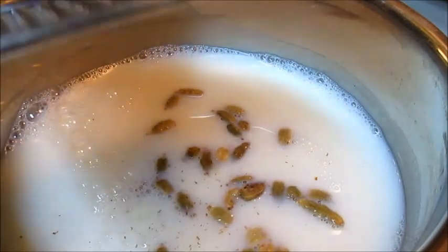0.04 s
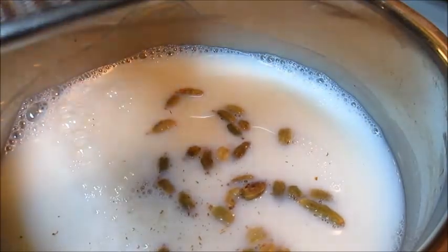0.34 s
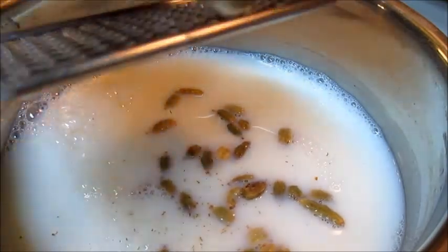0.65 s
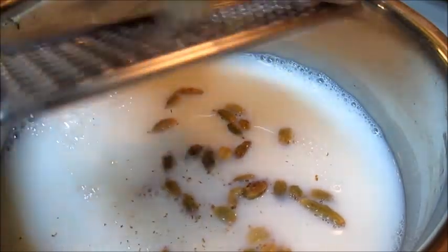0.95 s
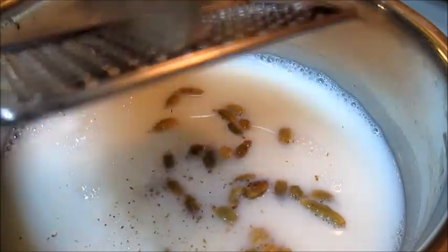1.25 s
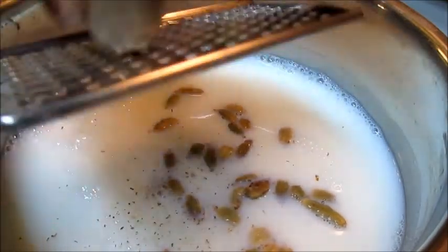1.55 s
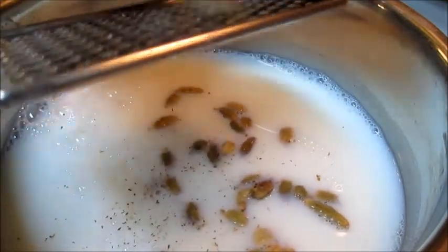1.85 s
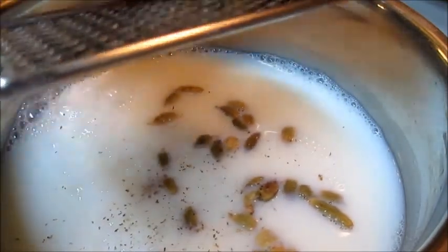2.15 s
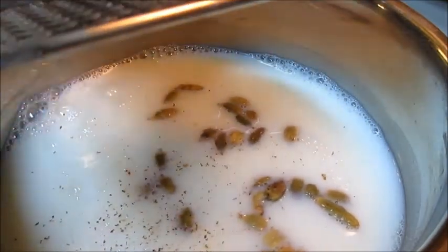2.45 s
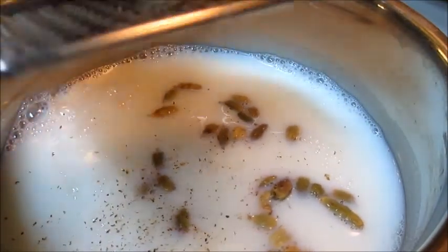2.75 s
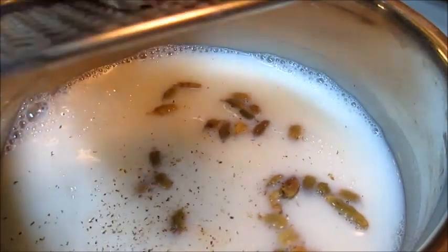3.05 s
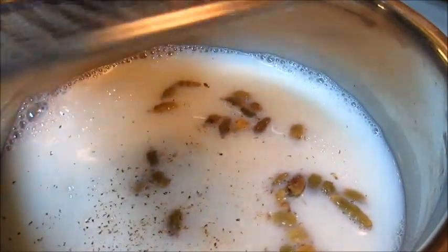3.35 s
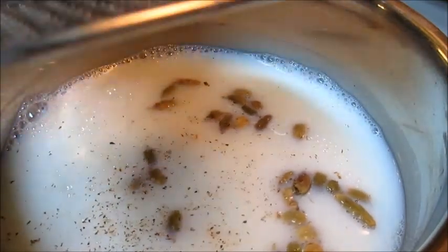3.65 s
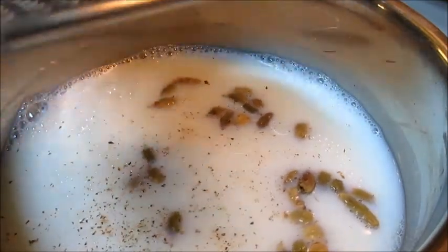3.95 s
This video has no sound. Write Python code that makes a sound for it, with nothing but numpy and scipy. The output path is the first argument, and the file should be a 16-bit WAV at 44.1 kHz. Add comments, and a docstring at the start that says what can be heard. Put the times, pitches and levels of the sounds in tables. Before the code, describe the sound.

A hard spice is grated on a metal grater, close to the microphone. A light metal tap comes at the very start. From about 0.5 seconds until the end at 4 seconds, short, bright rasps go back and forth, nearly four cycles a second. The return strokes bump over the teeth and make the plate ring briefly. Small knocks and sharp ticks are scattered throughout, over a soft, low kitchen hum.

```python
"""First comes a light metal tap as the grater touches the pot; then quick grating starts, to and fro.
A hard spice is rubbed on a flat metal grater held over a pot of milk. The teeth chip it in
bright, rasping cuts. On each way back it bumps over them and the plate rings near 1 kHz,
at a pitch that follows the point of contact. Knocks on the plate and sharp ticks come
now and then, and a soft kitchen hum lies underneath."""
import sys
import numpy as np
from scipy import signal
from scipy.fft import rfft, irfft
from scipy.io import wavfile
from scipy.ndimage import uniform_filter1d

SR = 44100
rng = np.random.default_rng(int(sys.argv[2]) if len(sys.argv) > 2 else 0)


def bounce(signal):
    """Save signal as a 16-bit WAV file at the path given by the first command-line argument."""
    frames = np.transpose(np.atleast_2d(signal))
    limited = np.clip(frames, -1, 1)
    pcm = np.round(limited * 32767).astype(np.int16)
    wavfile.write(sys.argv[1], SR, pcm)


N = 176400  # 4 seconds
TEETH_PER_S = 110  # how many teeth the moving spice meets each second


def amp(db):
    """Turns decibels into a number to multiply by."""
    return 10 ** (np.asarray(db) / 20)


def unit(x):
    """Scales a sound to a total energy of 1."""
    return x / np.sqrt(np.sum(x ** 2) + 1e-20)


def read(points, hz):
    """Looks up a table between its rows, with every octave equally wide."""
    f, value = np.transpose(points)
    return np.interp(np.log(hz + 1), np.log(f + 1), value)


def add(mix, start_s, sound):
    """Adds a sound to the mix at a given time."""
    part = mix[max(round(start_s * SR), 0):][:len(sound)]
    part += sound[:len(part)]


def click(tone, size=4096):
    """A click with the given balance of low and high frequencies."""
    log_gain = np.log(amp(read(tone, abs(np.fft.fftfreq(size, 1 / SR)))))
    spectrum = np.exp(np.conj(signal.hilbert(log_gain)))  # packs the energy at the start
    return unit(np.fft.ifft(spectrum).real[:size // 2])


def ringing(notes):
    """The fading sine waves of a struck object."""
    t = np.arange(SR // 2) / SR
    return unit(sum(amp(db - 60 * t / fade_s) * np.sin(2 * np.pi * hz * t) for hz, db, fade_s in notes))


def echoes(fade_times, size=22050):
    """Dense echoes: noise that fades by 60 dB in the time given for each frequency."""
    hz, t, bands = signal.stft(rng.standard_normal(size), SR, nperseg=128)
    fade = amp(-60 * t / read(fade_times, hz)[:, None])
    return unit(signal.istft(bands * fade, SR, nperseg=128)[1][:size])


def through(force, body):
    """Plays a force through a body, given as its sound when tapped once."""
    return unit(signal.oaconvolve(force, body[:len(force)])[:len(force)])


# Tone of the kitchen hum (frequency [Hz], level [dB per Hz])
HUM_TONE = [(25, -1.5), (70, -9), (120, -2.5), (180, -6.5), (380, -3), (800, -6), (1500, -13.5),
            (3000, -26.5), (7000, -34), (15000, -45)]
# How loud the hum is as time passes (time [s], level [dB])
HUM_LOUDNESS = [(0, -53.5), (.1, -63), (.25, -56.5), (.48, -51.5), (.8, -52), (1.5, -58), (4, -55.5)]


def kitchen_hum(hiss_db=-75.5):
    """Soft, low noise that swells before the grating starts, over a faint steady hiss."""
    tone = amp(read(HUM_TONE, np.fft.rfftfreq(N, 1 / SR)))
    noise = irfft(rfft(rng.standard_normal(N)) * tone, N)
    level = amp(np.interp(np.arange(N) / SR, *np.transpose(HUM_LOUDNESS)))
    return unit(noise) * np.sqrt(N) * level + amp(hiss_db) * rng.standard_normal(N)


# Tone of the thud (frequency [Hz], level [dB per Hz])
THUD_TONE = [(25, -23), (60, -3), (110, 4), (180, 6.5), (350, 0), (600, -19.5), (1500, -108), (6000, -135)]


def thud(force):
    """The dull push of the hand and the spice."""
    return through(force, click(THUD_TONE))


# The bending plate's own notes (pitch [Hz], level [dB], time to fade by 60 dB [s])
PLATE_NOTES = [(1040, 0, .19), (1143, -7, .07), (2020, -7, .09)]


def plate(force, hz, width_hz):
    """The plate bends at a pitch set by the point of contact, then rings on with its own notes."""
    bend = resonate(force, hz, width_hz)
    overtone = unit(resonate(force, 1.735 * hz, 2 * width_hz))
    own_notes = through(unit(bend) + unit(force), ringing(PLATE_NOTES))
    return unit(through(bend, click(RASP_TONE)) + amp(-10) * overtone + amp(-8.5) * own_notes)


def resonate(force, hz, width_hz):
    """Keeps a narrow band of sound around a pitch that may slide."""
    turn = np.exp(2j * np.pi * np.cumsum(hz) / SR)
    r = np.exp(-np.pi * width_hz / SR)
    # Shift the pitch down to 0 Hz, smooth, then shift it back up.
    return (turn * signal.lfilter([(1 - r) ** 2], [1, -2 * r, r ** 2], force / turn)).real


# How long plate and pot ring on (frequency [Hz], time to fade by 60 dB [s])
RING_TIMES = [(200, 0.036), (700, 0.057), (2000, 0.056), (5000, 0.048), (14000, 0.033)]


def ring_out(force, gain_db=5.5):
    """Plate and pot ring on briefly after each touch."""
    return amp(gain_db) * signal.fftconvolve(force, echoes(RING_TIMES, size=4096))[:len(force)]


# Tone of spice scraping on steel (frequency [Hz], level [dB per Hz])
RASP_TONE = [(300, -23.5), (530, -11), (715, 2.5), (900, 1), (1270, -3.5), (1600, 1), (2020, 2), (2650, -6),
             (3200, -2), (4400, -4), (6000, -7.5), (10500, -15.5), (13000, -21), (15500, -32)]
# The steel's higher, thinner notes (pitch [Hz], level [dB], time to fade by 60 dB [s])
STEEL_NOTES = [(1545, -4, .06), (1735, -2, .06), (2023, 0, .08), (2005, -23, .9), (2485, -6, .07),
               (3865, -5, .045), (4168, -3, .05), (4700, -5, .05), (5660, -8, .06), (6360, -10, .06)]


def rasp(force, rows=3, steel_db=-9.5):
    """A scrape on steel; each row of teeth rings out a little differently."""
    row = (np.arange(len(force)) * TEETH_PER_S / SR).astype(int) % rows
    ring = sum(ring_out(force * (row == k)) for k in range(rows))
    scrape = through(force + ring, click(RASP_TONE))
    return scrape + amp(steel_db) * through(force, ringing(STEEL_NOTES))


def grit(size, cracks_per_s=14000, spread_db=5):
    """Tiny cracks in the spice, some much stronger than others."""
    cracks = (rng.random(size) < cracks_per_s / SR) * rng.choice([-1, 1], size)
    return cracks * amp(spread_db * np.minimum(rng.exponential(1, size), 2.5))


def scuff(from_s=0.56, press_s=0.0024, light_touch_db=-26):
    """The spice slides lightly between strokes and presses harder just before each one."""
    t = np.arange(N) / SR
    starts = np.sort([row[0] for row in list(CUT_STROKES) + list(BACK_STROKES)])
    until_next = np.append(starts, np.inf)[np.searchsorted(starts, t)] - t
    pressure = amp(light_touch_db) + np.exp(-until_next / press_s)
    force = grit(N) * (t > from_s) * pressure
    return np.sqrt(N) * (amp(-58) * rasp(force) + amp(-60.5) * through(force, ringing(PLATE_NOTES)))


def tick(force, above_hz=3600):
    """A sharp tick: only the treble of a short hit on the steel."""
    treble = signal.butter(2, above_hz, "high", fs=SR, output="sos")
    return through(signal.sosfilt(treble, force + ring_out(force)), click(RASP_TONE))


# The opening metal tap, then knocks on the plate
# (time [s], rasp level [dB], plate level [dB], plate pitch [Hz])
TAP_AND_KNOCKS = [(0.014, -32.5, -38, 933), (0.522, -29.5, -43, 870), (.556, -37, -45, 870),
                  (.579, -37, -47, 970), (.765, -43, -45, 830), (0.862, -43, -43, 755),
                  (.879, -39.5, -34, 710), (.931, -41, -28, 1030), (0.957, -31, -38, 930),
                  (1.013, -50, -31, 950), (1.025, -40, -23.5, 985), (1.069, -30.5, -29, 1290),
                  (1.282, -38, -30, 1010), (1.481, -39.5, -44, 880), (1.565, -35, -26.5, 1002),
                  (1.59, -34, -29.5, 1147), (1.66, -37, -38, 1240), (1.985, -36.5, -37.5, 980),
                  (2.055, -39, -36, 1110), (2.222, -45, -34, 1090), (2.271, -49.5, -45.5, 1000),
                  (2.44, -34.5, -33.5, 875), (2.514, -44.5, -45, 1010), (2.587, -33.5, -42, 995),
                  (2.669, -32, -40, 920), (2.698, -32, -33, 1144), (2.802, -49, -42, 1090),
                  (3.105, -32.5, -35, 1220), (3.184, -33.5, -39, 785), (3.226, -37.5, -32.5, 1030),
                  (3.36, -36, -32.5, 1200), (3.439, -34.5, -38, 1200), (3.597, -35, -31, 1040),
                  (3.692, -42, -39.5, 905), (3.832, -42, -29.5, 970), (3.846, -40, -27.5, 1070),
                  (3.878, -40, -36, 1350)]
# The bright edge of the opening tap, then sharp ticks during the grating (time [s], level [dB])
TICKS = [(0.0152, -41.5), (1.398, -38), (1.66, -38), (1.904, -35.5), (2.146, -38), (2.909, -37.5),
         (3.418, -40.5)]


def tap_and_knocks(crack_s=0.00067, push_s=0.0001, span_s=0.0079):
    """The grater taps the pot lightly; then come knocks on the plate and sharp ticks."""
    out, t = np.zeros(N), np.arange(SR // 2) / SR
    push = np.exp(-t / push_s)
    crack = lambda: rng.standard_normal(len(t)) * t * np.exp(-t / crack_s)
    for start, rasp_db, plate_db, hz in TAP_AND_KNOCKS:
        hit = rasp(crack()) + amp(-19.5) * thud(push)
        ring = plate(push, np.full(len(t), hz), width_hz=139)
        add(out, start, amp(rasp_db) * hit + amp(plate_db) * ring)
    for start, db in TICKS:
        add(out, start, amp(db) * tick(crack()))
    return np.sqrt(span_s * SR) * out  # levels count as if each hit were spread over span_s


def tooth_catches(size, first_s, count=40, jitter=0.25, spread_db=1.5):
    """One kick for each tooth the spice meets, uneven in timing and strength."""
    timing, strength = rng.standard_normal((2, count))
    gaps = np.exp(jitter * timing) / TEETH_PER_S
    at = ((np.cumsum(gaps) - gaps[0] + first_s) * SR).astype(int)
    kicks = np.zeros(size)
    kicks[at[at < size]] = amp(spread_db * strength)[at < size]
    return kicks


def arch(start_db, peak_at, end_db):
    """A gain curve that rises to 0 dB, then heads for end_db, as u goes from 0 to 1."""
    return lambda u: amp(start_db * np.maximum(1 - u / peak_at, 0)
                         + end_db * np.clip((u - peak_at) / (1 - peak_at), 0, 1) ** 2)


def stroke(length, rasp_db, plate_db, thud_db, steady_scrape, bite, bend, plate_hz, upper_hz, upper_db):
    """Each tooth sheds a burst of chips and bends the plate, whose two pitches slide as the spice moves."""
    attack_s, release_s, chip_s = 0.004103, 0.0049, 0.0013
    t = np.arange(SR // 5) / SR
    u = np.minimum(t / length, 1)  # how far along the stroke is, from 0 to 1
    contact = np.minimum(t / attack_s, 1) * np.exp(-np.maximum(t - length, 0) / release_s)
    teeth = tooth_catches(len(t), first_s=attack_s / 2)
    bursts = signal.fftconvolve(teeth, t / chip_s * np.exp(1 - t / chip_s))[:len(t)]
    crumbling = steady_scrape + bursts
    chips = unit(grit(len(t)) * crumbling * contact * bite(u))
    upper_ring = unit(resonate(chips, upper_hz(u), width_hz=230))
    scrape = unit(rasp(chips) + amp(upper_db) * upper_ring)
    bumps = (unit(teeth) + 0.85 * unit(grit(len(t)) * crumbling)) * contact * bend(u)
    ring = plate(bumps, plate_hz(u), width_hz=180)
    push = thud(rng.standard_normal(len(t)) * (0.97 + bursts) * contact * bite(u))
    return np.sqrt(length * SR) * (amp(rasp_db) * scrape + amp(plate_db) * ring + amp(thud_db) * push)


# Strokes back over the blunt side of the teeth (start [s], length [s], rasp level [dB],
# plate level [dB], thud level [dB], starting plate pitch [Hz], pitch change [Hz])
BACK_STROKES = [(0.746, 0.078, -35.5, -42, -55, 810, -38), (1.012, 0.08, -34.5, -32.5, -55, 970, 520),
                (1.274, 0.075, -34, -38, -53, 986, -60), (1.539, 0.062, -37.5, -38, -59, 928, 328),
                (1.786, 0.06, -39.5, -38, -54.5, 1020, 45), (2.047, 0.064, -38, -41, -55.5, 1030, -220),
                (2.319, 0.06, -40, -41, -51, 1135, -100), (2.561, 0.054, -39, -37.5, -55, 1060, 130),
                (2.804, 0.08, -41, -47.5, -52, 1106, -250), (3.065, 0.07, -39, -38.5, -54, 1047, 220),
                (3.309, 0.063, -38, -39, -64, 1020, 220), (3.572, 0.076, -35, -35.5, -57, 1003, 420),
                (3.833, 0.071, -37, -39.5, -58, 1040, 380)]


def back_strokes():
    """The spice bumps the plate's springy end, then scrapes harder; the pitch drifts with its path."""
    out = np.zeros(N)
    for start, length, rasp_db, plate_db, thud_db, hz, drift_hz in BACK_STROKES:
        add(out, start, stroke(length, rasp_db, plate_db, thud_db, steady_scrape=0.22,
                               bite=arch(start_db=-10, peak_at=0.43, end_db=0),
                               bend=arch(start_db=-0.5, peak_at=0.34, end_db=-16.5),
                               plate_hz=lambda u: hz + drift_hz * u ** 2,
                               upper_hz=lambda u: 1820 + 250 * u, upper_db=-6.5))
    return out


# Strokes that cut the spice (start [s], length [s], rasp level [dB], plate level [dB],
# thud level [dB], final plate pitch [Hz])
CUT_STROKES = [(0.592, 0.091, -32.5, -44, -46.5, 963), (0.876, 0.097, -33, -38, -52, 993),
               (1.144, 0.093, -33.5, -49.5, -53.5, 1020), (1.397, 0.074, -33, -43, -50.5, 980),
               (1.659, 0.078, -35.5, -45.5, -54.5, 1010), (1.905, 0.079, -35, -40, -48, 993),
               (2.164, 0.084, -35, -49, -54, 1086), (2.428, 0.072, -35, -41, -50, 970),
               (2.696, 0.036, -35, -42.5, -46.5, 1060), (2.929, 0.091, -37, -40.5, -52, 1020),
               (3.168, 0.091, -38.5, -50, -54, 990), (3.431, 0.09, -34, -40.5, -49, 984),
               (3.701, 0.084, -33.5, -40, -47.5, 966), (3.952, 0.082, -32.5, -48, -52, 790)]


def cut_strokes():
    """The teeth bite at once; both pitches sink as the spice nears the plate's springy end."""
    out = np.zeros(N)
    for start, length, rasp_db, plate_db, thud_db, hz in CUT_STROKES:
        add(out, start, stroke(length, rasp_db, plate_db, thud_db, steady_scrape=0.29,
                               bite=arch(start_db=-1, peak_at=0.43, end_db=-10.5),
                               bend=arch(start_db=-2, peak_at=0.54, end_db=-4.5),
                               plate_hz=lambda u: hz * (1.1 - 0.1 * u),
                               upper_hz=lambda u: 2250 - 480 * u, upper_db=-11.5))
    return out


def scene(room_s=0.4, room_db=-18, width_db=-18.5):
    """The grater is close and central, with a little room echo; only the treble spreads out."""
    grater = cut_strokes() + back_strokes() + tap_and_knocks() + scuff()
    room = signal.fftconvolve(grater, echoes([(100, room_s), (10000, room_s)]))[:N]
    middle = grater + amp(room_db) * room + kitchen_hum()
    flicker = unit(uniform_filter1d(rng.standard_normal(N), size=100)) * np.sqrt(N)
    side = signal.sosfilt(signal.butter(2, 6000, "high", fs=SR, output="sos"), middle * flicker)
    return middle + amp(width_db) * np.array([side, -side])


def record(dry, top_hz=15850):
    """Removes the very highest treble."""
    low_pass = signal.firwin(511, top_hz, window=("kaiser", 9), fs=SR)
    return signal.oaconvolve(dry, low_pass[None], "same")


dry = scene()
out = record(dry)
bounce(out)
```